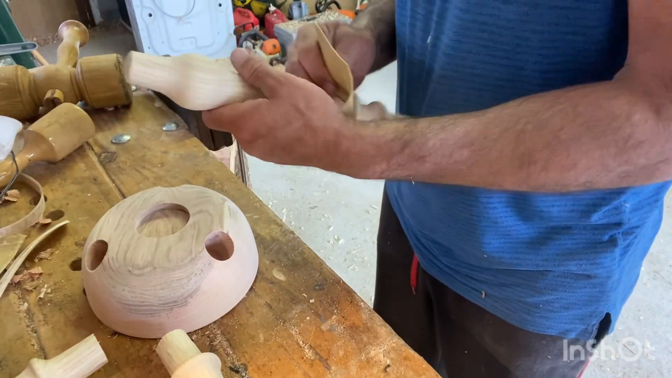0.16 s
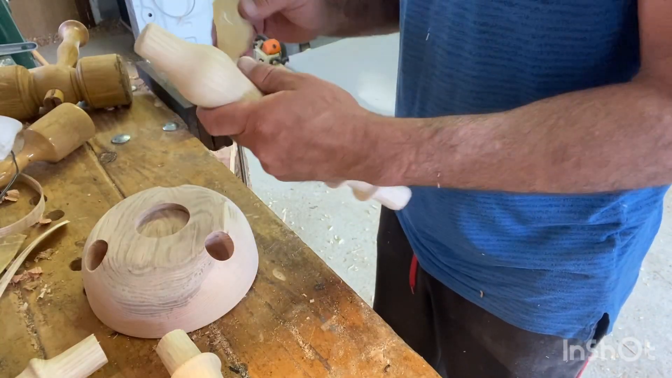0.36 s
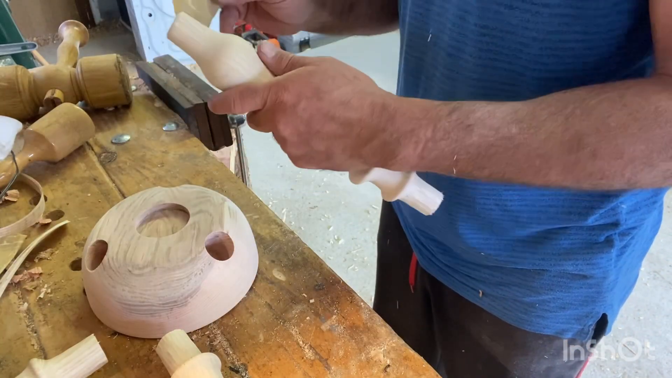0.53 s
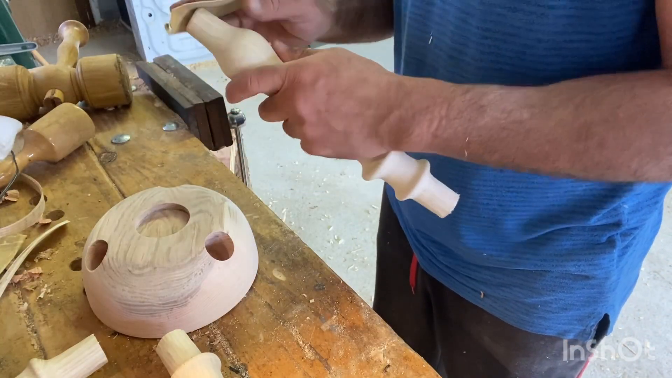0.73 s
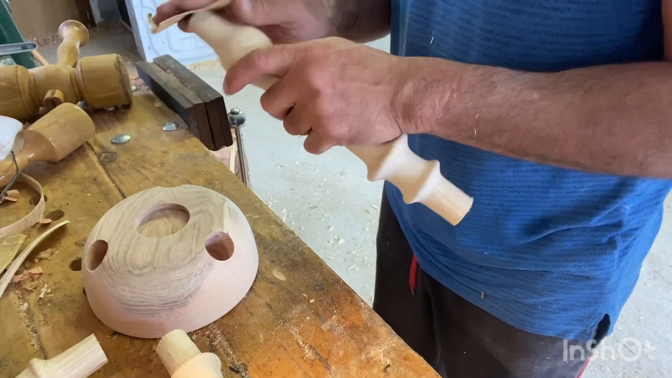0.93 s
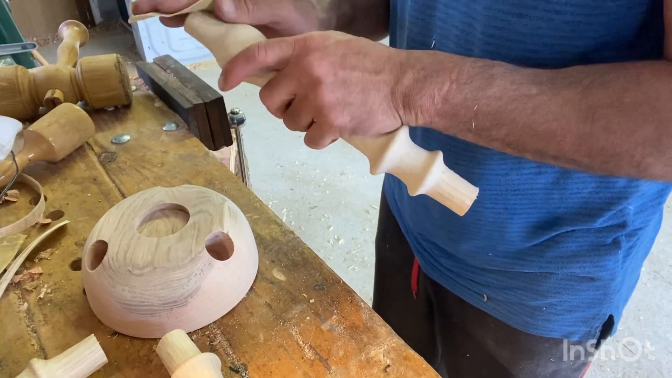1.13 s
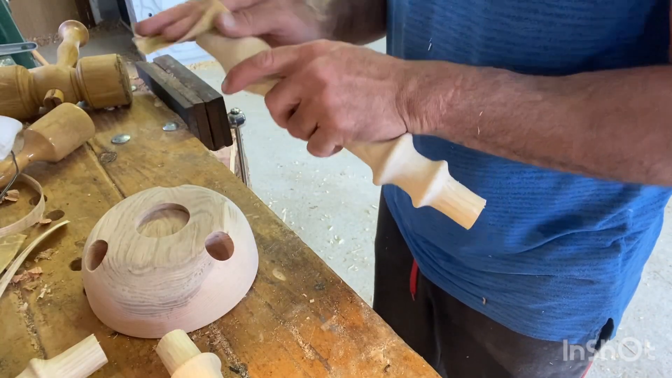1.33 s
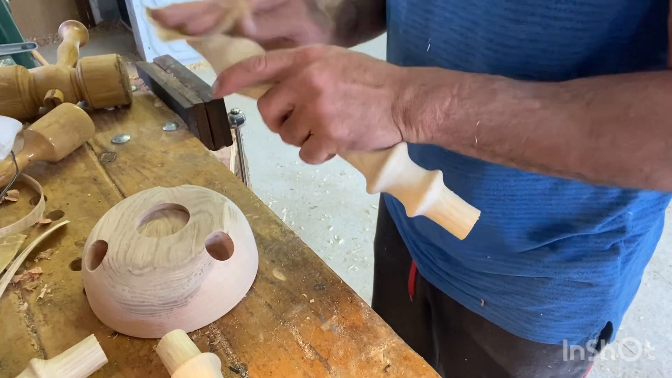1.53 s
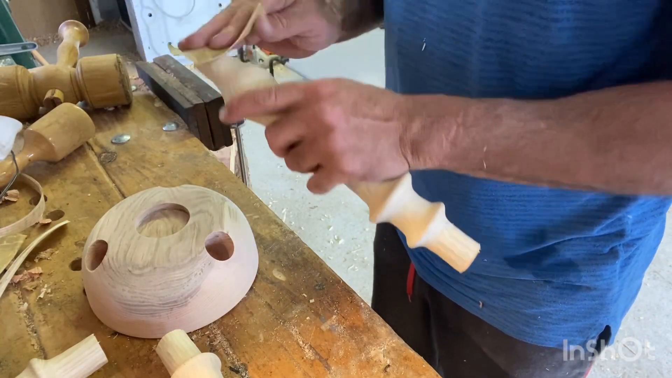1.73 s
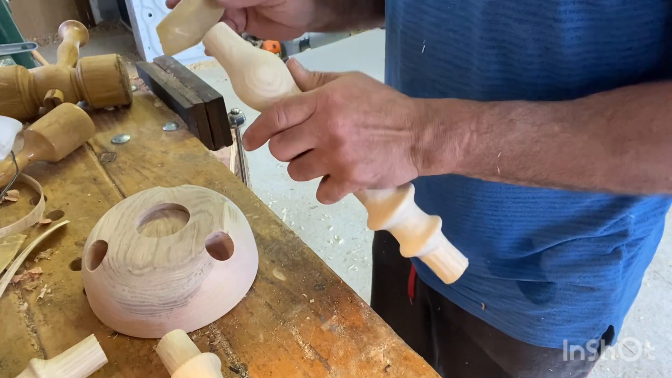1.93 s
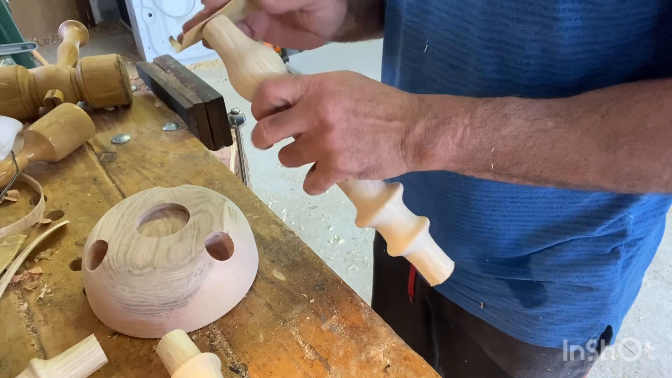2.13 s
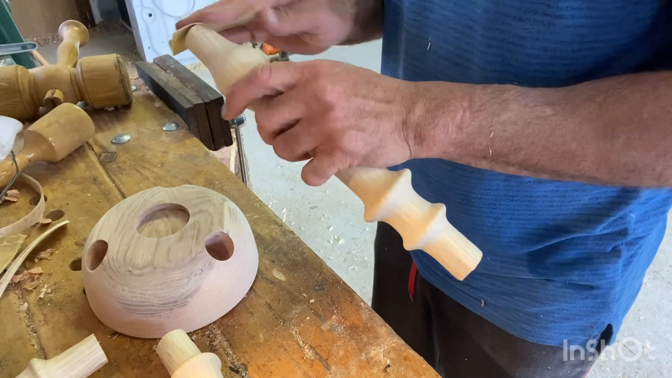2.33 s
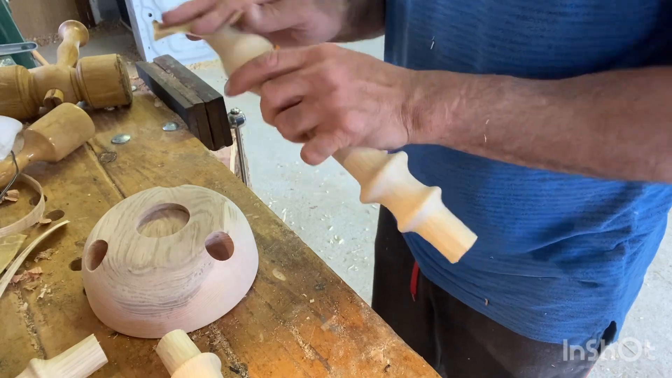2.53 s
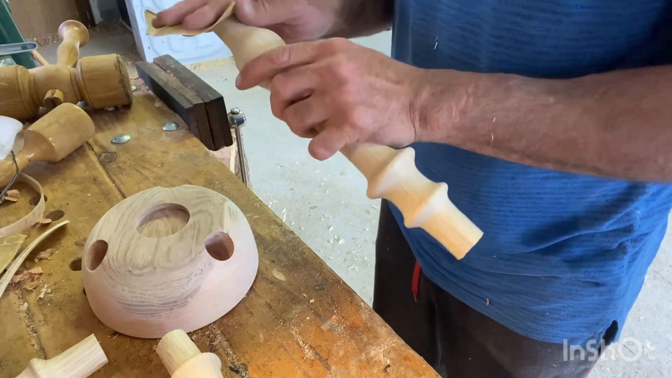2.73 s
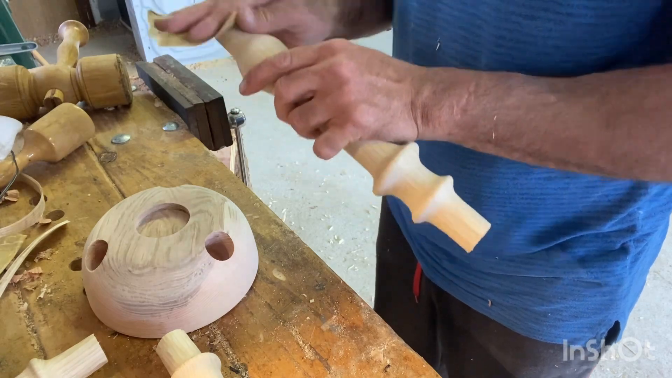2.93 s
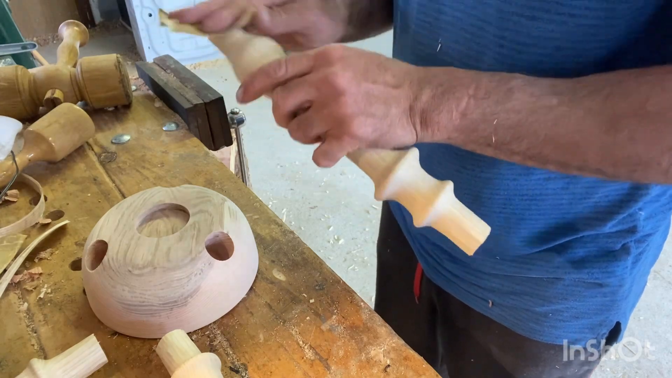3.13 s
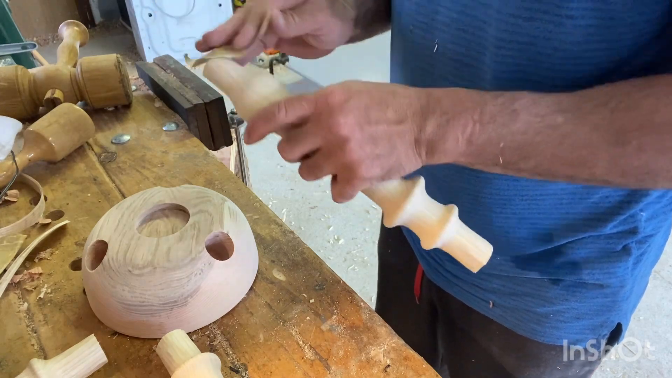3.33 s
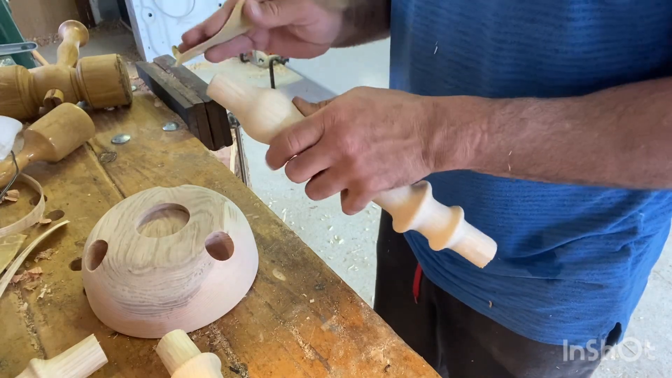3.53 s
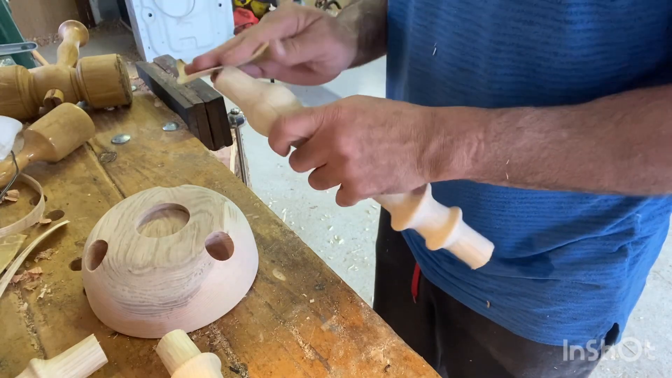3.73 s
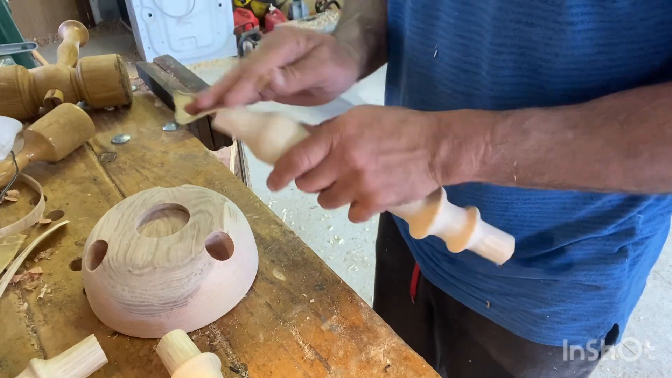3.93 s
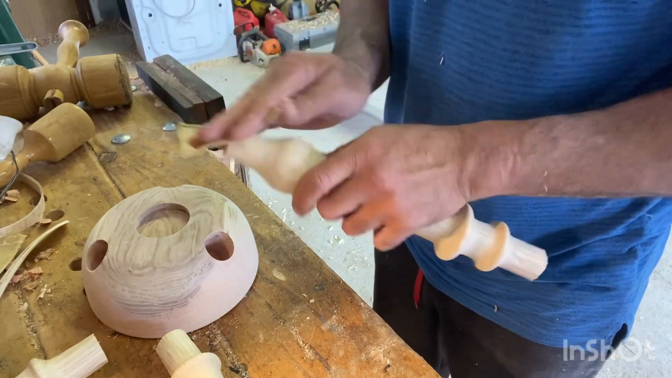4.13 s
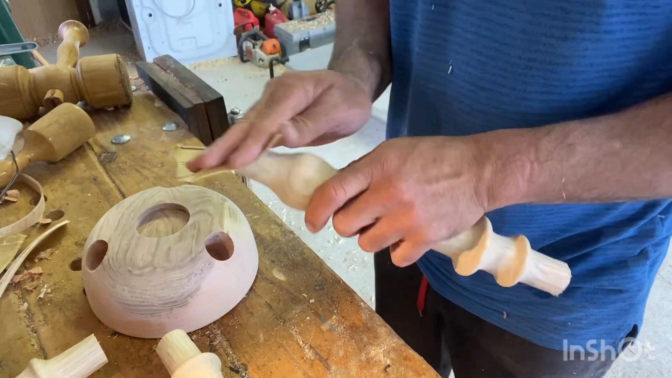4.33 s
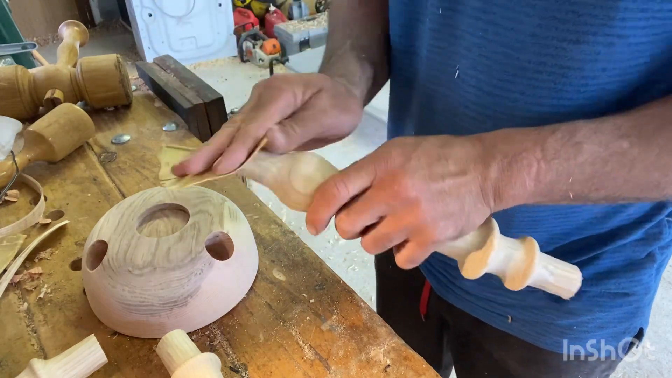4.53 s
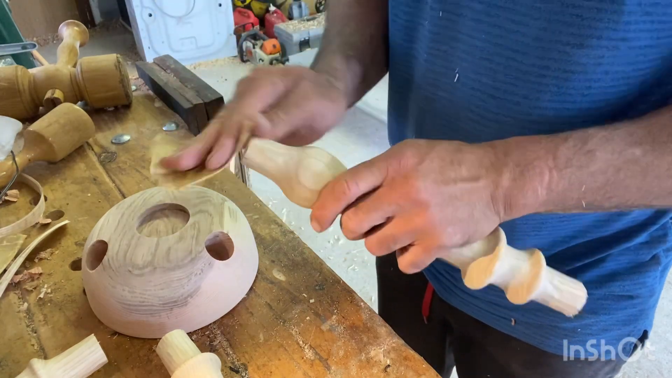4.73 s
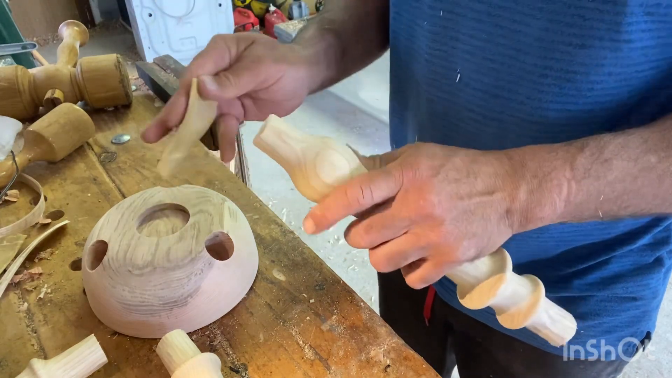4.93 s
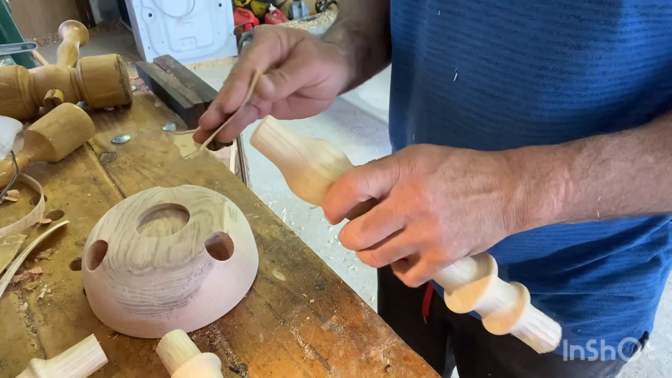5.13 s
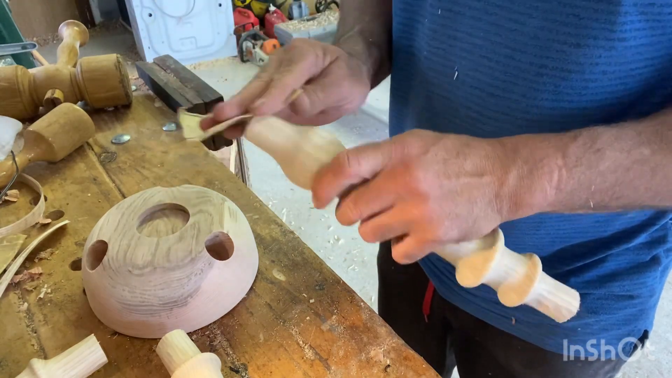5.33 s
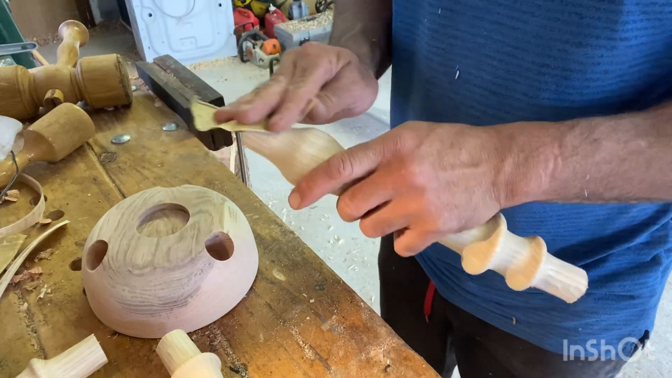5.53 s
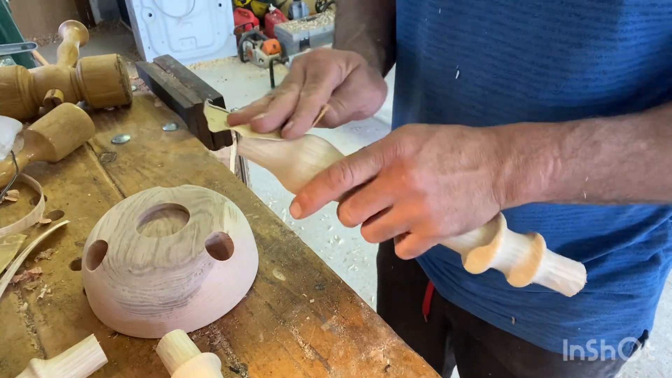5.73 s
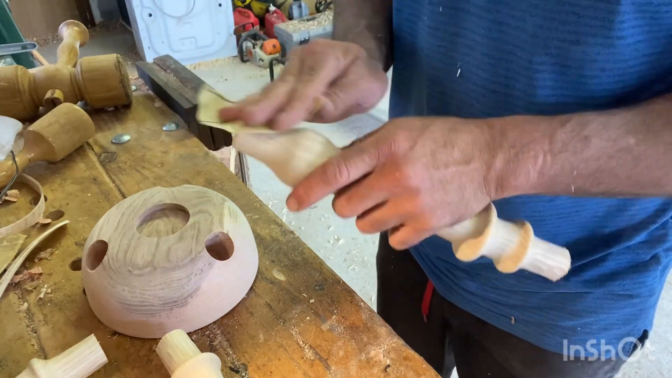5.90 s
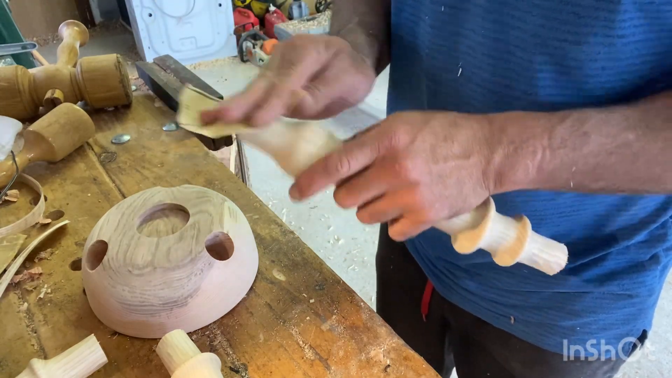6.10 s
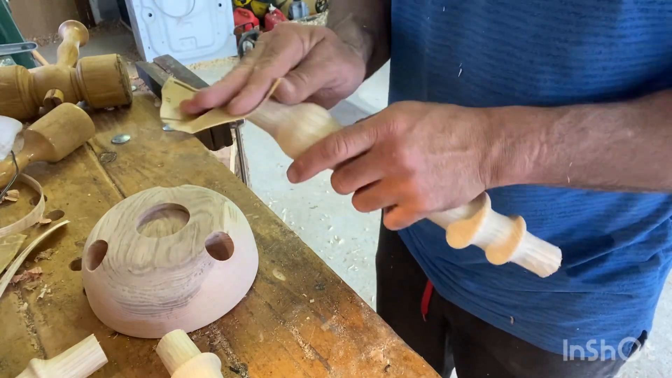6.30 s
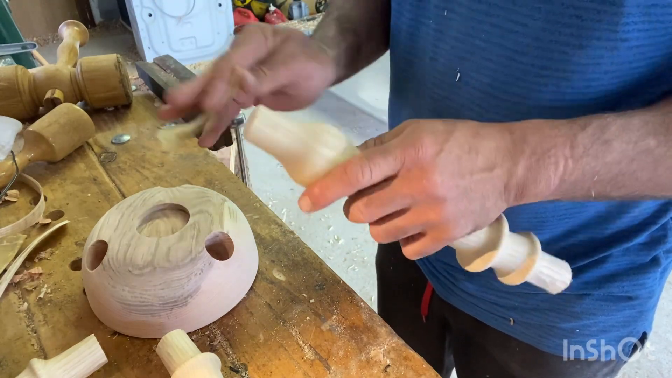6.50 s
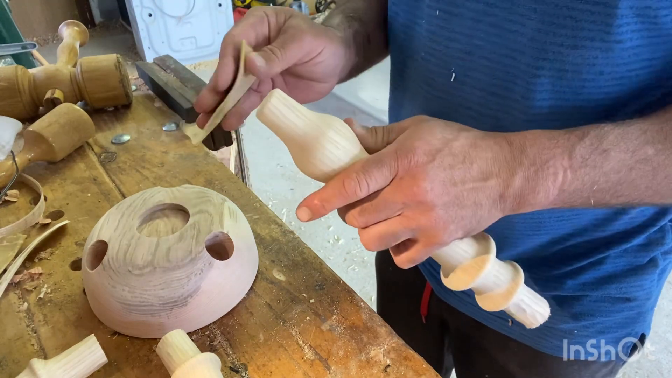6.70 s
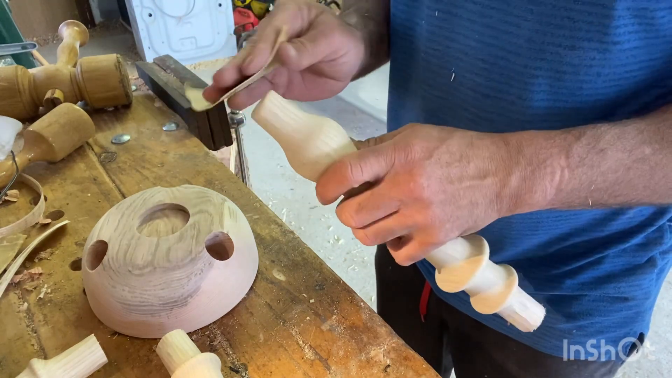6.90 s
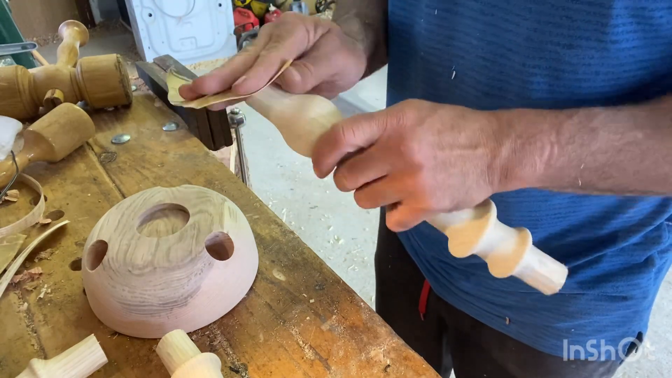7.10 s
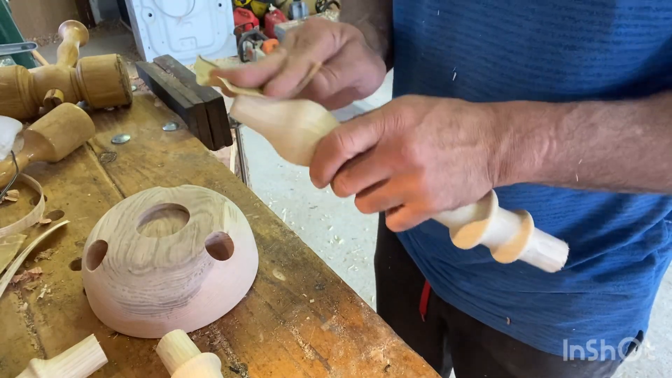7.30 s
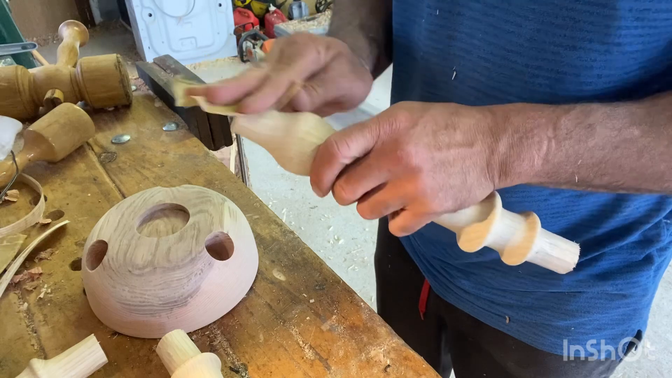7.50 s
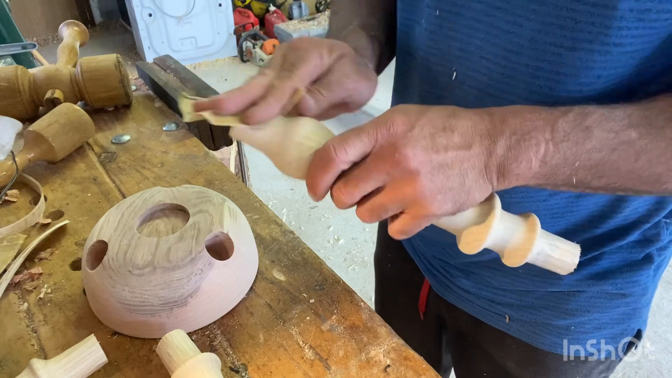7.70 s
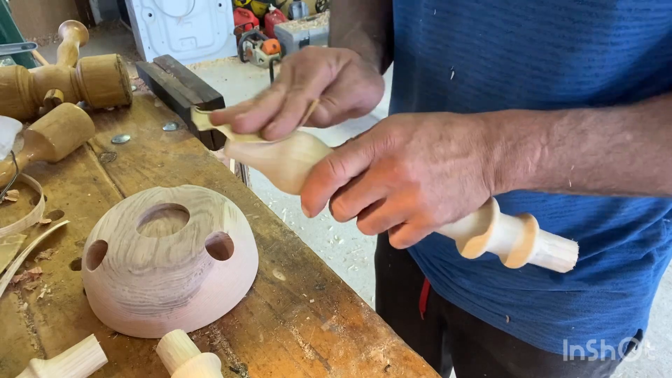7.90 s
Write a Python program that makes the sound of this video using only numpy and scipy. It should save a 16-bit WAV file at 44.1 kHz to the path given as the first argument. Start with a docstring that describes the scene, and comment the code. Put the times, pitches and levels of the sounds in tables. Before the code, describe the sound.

Close, scratchy hand sanding on a piece of wood in a small workshop. The paper brushes softly at first, then rasps to and fro in fast, fairly even strokes, stopping briefly three times and starting again. The wood resonates lightly under the grit, and paper or fingers tap it now and then. A faint mains hum, low rumble and thin hiss continue underneath.

```python
"""Sanding a wooden leg

A hand rubs sandpaper back and forth over the end of a turned wooden leg in a workshop.
Grit catches the grain in dense tiny clicks that hiss off the paper and ring the wood, with light
brushes and a few taps. The room answers, and mains hum, rumble and a faint hiss lie below."""
import sys
import numpy as np
from scipy import signal
from scipy.fft import rfft, irfft, next_fast_len
from scipy.io import wavfile

SR = 44100
rng = np.random.default_rng(int(sys.argv[2]) if len(sys.argv) > 2 else 0)


def master(y):
    """Save y as 16-bit WAV."""
    cut = np.clip(np.atleast_2d(y).T, -1, 1)
    pcm = np.round(cut * 32767)  # scale
    wavfile.write(sys.argv[1], SR, pcm.astype(np.int16))


N = 350595

# stereo lean across the spectrum: (frequency [Hz], left over right [dB])
PAN = [(60, 1.5), (240, 8), (950, 2.5), (3770, 4), (15000, -4.5)]


def from_db(db):
    return 10 ** (np.asarray(db) / 20)


def rms_one(x):
    return x / np.sqrt(np.mean(x ** 2) + 1e-20)


def at_hz(points, hz):
    freqs, values = np.transpose(points)
    return np.interp(np.log(hz), np.log(freqs), values)


def pan(left_over_right_db):
    return from_db([[left_over_right_db / 2], [-left_over_right_db / 2]])


def delayed(x, samples):
    return np.concatenate([np.zeros(samples), x])[:N]


def drift(rate_hz):
    """Smooth random wander of rms 1: low-passed noise, drawn at every 20th sample."""
    pole = np.exp(-2 * np.pi * rate_hz * 20 / SR)
    slow = signal.lfilter([1], [1, -2 * pole, pole ** 2], rng.standard_normal(N // 20 + 4002))[4000:]
    return np.interp(np.arange(N) / 20, np.arange(len(slow)), rms_one(slow))


def resonate(x, hz, width_hz):
    """Two-pole resonance scaled so that white noise keeps its rms."""
    r = np.exp(-np.pi * width_hz / SR)
    gain = np.sqrt((1 - r * r) / 2)
    return signal.lfilter([gain, 0, -gain], [1, -2 * r * np.cos(2 * np.pi * hz / SR), r * r], x)


def stereo_bands(sources, spectrum, flicker_db, flicker_hz):
    """Colours two (mid, side) noise pairs, which take turns feeding flickering third-octave bands."""
    # stereo image: (frequency [Hz], left-right correlation [0..1])
    correlation = [(30, .85), (130, .5), (400, .2), (1700, .75), (3000, .3), (6000, .1)]
    out, power = 0, 0
    edges = 20 * 2 ** (np.arange(30) / 3)
    for k, (low, high) in enumerate(zip(edges, edges[1:])):
        if high < spectrum[0][0] or low > spectrum[-1][0]:
            continue
        hz = np.sqrt(low * high)
        level = from_db(at_hz(spectrum, hz))
        power += level ** 2 * (high - low) / (SR / 2)
        band = signal.butter(2, [low, high], "band", fs=SR, output="sos")
        mid, side = signal.sosfilt(band, sources[k % 2])
        alike = at_hz(correlation, hz)
        pair = np.sqrt(1 + alike) * mid + np.sqrt(1 - alike) * side * [[1], [-1]]
        out += level * from_db(flicker_db * drift(flicker_hz)) * pan(at_hz(PAN, hz)) * pair
    return out / np.sqrt(2 * power)


def workshop_tone(hum_hz=99.8, hum_db=-63.5, bed_db=-63.5):
    """Wavering mains hum, off to the left, over a bed of rumble and faint hiss."""
    # colour of the bed: (frequency [Hz], relative density [dB])
    bed_spectrum = [(30, -22), (64, -2.5), (130, -19.5), (300, -29), (1700, -40.5), (3700, -35),
                    (6000, -28), (9300, -36), (10500, -73)]
    phase = 2 * np.pi * hum_hz * np.arange(N) / SR + .5 * drift(1.0)
    hum = np.sqrt(2) * from_db(hum_db + 2.6 * drift(5.4)) * np.sin(phase)
    bed = stereo_bands(rng.standard_normal((2, 2, N)), bed_spectrum, flicker_db=3.5, flicker_hz=2.5)
    return hum * pan(12.5) + from_db(bed_db) * bed


def room(x, t60_s=0.51, wall_cut_hz=8800):
    """Sound bounces between the walls: eight feedback delays a side, duller on every round."""
    size = next_fast_len(N + SR)
    omega = 2 * np.pi * np.arange(size // 2 + 1) / size
    pole = np.exp(-2 * np.pi * wall_cut_hz / SR)
    wall = (1 - pole) / (1 - pole * np.exp(-1j * omega))
    response = np.zeros((2, len(omega)), complex)
    for k, lag in enumerate((rng.uniform(.015, .045, 16) * SR).astype(int)):
        loop = from_db(-60 * lag / SR / t60_s) * wall * np.exp(-1j * omega * lag)
        response[k % 2] += loop / (1 - loop) * (-1) ** (k // 2)
    return irfft(response * rfft(x.mean(axis=0), size), size)[:, :N]


def near_echoes(x, palm_lag_s=.0006, bench_lag_s=.0023, sway=.3, strength=.6):
    """Bounces off palm and bench wander with the hand and comb the hiss differently on every stroke."""
    for lag_s in (palm_lag_s, bench_lag_s):
        lag = (SR * lag_s * np.exp(sway * drift(4.0))).astype(int)
        echo = x[:, np.maximum(np.arange(N) - lag, 0)]
        x = (x + strength * echo) / np.hypot(1, strength)
    return x


def taps():
    """Paper and fingers tap the wood: one click each, and the dull thud of the fingertip behind it."""
    # taps on the leg: (time [s], click drive [dB], thud peak [dB])
    hits = [(0.237, -43, -47.5), (4.012, -39, -55), (4.819, -47, -75), (6.797, -41.5, -70),
            (7.573, -36, -56)]
    impulses = np.full((2, N), 1e-18)
    for time_s, *levels_db in hits:
        impulses[:, round(time_s * SR)] = from_db(levels_db)
    clicks, fingertip = impulses
    thuds = resonate(fingertip, hz=820, width_hz=110)
    return clicks, thuds * fingertip.max() / np.abs(thuds).max()


def contact(start, end, slope_db, rise_s, fall_s=0.0058, arch_db=1):
    """Span and envelope of one rub; it swells mid-stroke, where the hand moves fastest."""
    span = slice(max(int((start - .06) * SR), 0), min(int((end + .1) * SR), N))
    t = np.arange(span.start, span.stop) / SR
    gate = 1 / (1 + np.exp((start - t) / rise_s)) / (1 + np.exp((t - end) / fall_s))
    along = np.interp(t, [start, end], [-1, 1])
    return span, gate * from_db(slope_db / 2 * along + arch_db * (.5 - along ** 2))


def hand_pressure(pause_s=.09, firm_db=-32.5, firm_shake_db=-40, wood_follows=0.68):
    """Rubbing strength, and the part that shakes the wood; after a pause the paper lands abruptly."""
    # sanding strokes: (start [s], end [s], drive [dB], change along the stroke [dB])
    strokes = [(0.696, 0.742, -42, 10.5), (0.79, 0.869, -40, 11.5), (0.916, 1.009, -39, -10.5),
               (1.038, 1.121, -39, -0.5), (1.156, 1.227, -36.5, 2.5), (1.271, 1.351, -29.5, 2),
               (1.388, 1.461, -30, 1), (1.504, 1.577, -31, 3), (1.632, 1.685, -30, 7.5),
               (1.734, 1.77, -36, 10.5), (2.138, 2.18, -49, 8), (2.199, 2.245, -43, 1),
               (2.304, 2.353, -31.5, 2), (2.408, 2.482, -35.5, -1.5), (2.522, 2.596, -35, -5),
               (2.641, 2.708, -34, 1), (2.753, 2.828, -34.5, -5), (2.877, 2.935, -31.5, 2.5),
               (2.977, 3.055, -33, 1.5), (3.091, 3.16, -34, 1), (3.208, 3.298, -34.5, -12.5),
               (3.308, 3.353, -38, 6), (3.711, 3.786, -47.5, 0.5), (3.788, 3.854, -42, -3),
               (3.888, 3.964, -34.5, -8), (4.008, 4.082, -38, 6.5), (4.118, 4.176, -32.5, 2),
               (4.226, 4.302, -33.5, 0), (4.332, 4.405, -34, -7), (4.449, 4.513, -30, 1),
               (4.556, 4.622, -33, -10.5), (4.667, 4.738, -29.5, 2), (5.234, 5.313, -48, -1),
               (5.315, 5.379, -33.5, 8.5), (5.416, 5.477, -31.5, -1.5), (5.533, 5.593, -39.5, -2),
               (5.634, 5.701, -33, -9), (5.741, 5.812, -33, 8), (5.849, 5.919, -33, 2.5),
               (5.972, 6.04, -31.5, -0.5), (6.08, 6.153, -32, -8.5), (6.195, 6.271, -33.5, -4.5),
               (6.309, 6.421, -31.5, -13), (6.411, 6.44, -30.5, 16.5), (6.985, 7.024, -43, 0),
               (7.028, 7.085, -39, 3.5), (7.127, 7.208, -30.5, -2), (7.259, 7.319, -36.5, -5),
               (7.393, 7.433, -57, 11), (7.481, 7.542, -36, -6), (7.581, 7.643, -34, -3),
               (7.693, 7.754, -33.5, -9), (7.792, 7.861, -30, 4.5), (7.911, 7.966, -32, -9)]
    # bite into the wood as the paper tilts on the end grain: (time [s], shake offset [dB])
    bite = [(0.75, -2), (0.95, 3), (1.3, -3.5), (1.75, -8.5), (2.2, 1.5), (2.45, -1.5), (3.3, -7),
            (3.75, 0.5), (4.7, -7.5), (5.35, 1), (5.7, -1.5), (6.4, -3.5), (7.15, -1.5), (7.3, -2),
            (7.9, -7)]
    # light brushes of paper or fingers in the pauses: (start [s], end [s], drive [dB], wood share [dB])
    brushes = [(0.144, 0.206, -61.5, -9), (0.22, 0.29, -63.5, -3), (0.291, 0.334, -50, -14),
               (0.37, 0.4, -46, -18), (0.501, 0.541, -44.5, -24), (0.583, 0.611, -50, -14),
               (0.633, 0.657, -59, -26), (2.09, 2.144, -57, -13), (3.546, 3.581, -61.5, -44),
               (4.975, 5.074, -55, -24), (5.176, 5.22, -55, -33), (6.675, 6.746, -55.5, -39)]
    force = np.zeros((2, N))
    last_end = -np.inf
    for start, end, db, slope_db in strokes:
        lands = start - last_end > pause_s
        span, shape = contact(start, end, slope_db, rise_s=.0006 if lands else .0053)
        shake_db = firm_shake_db + wood_follows * (db - firm_db) + np.interp(start, *np.transpose(bite))
        force[:, span] += shape * from_db([[db], [shake_db]])
        last_end = end
    for start, end, db, share_db in brushes:
        span, shape = contact(start, end, slope_db=-3.5, rise_s=.0035)
        force[:, span] += shape * from_db([[db], [db + share_db]])
    return force * from_db(0.82 * drift(38.0))   # the paper catches and slips unevenly


def grit(per_s, spread_db, streams):
    """Grains catching the wood fibres: dense clicks of uneven size, coming in clumps."""
    shape = (streams, N)
    sizes = from_db(spread_db * np.minimum(rng.exponential(1, shape), 5)) * rng.standard_normal(shape)
    catches = rng.random(shape) < per_s / SR
    return rms_one(sizes * catches) * from_db(drift(57))


def wooden_leg(rubbing, shake, clicks, fingers_db=-81.5):
    """Grit and taps ring the modes of the leg; the holding hand damps some and frees others."""
    # modes of the leg: (frequency [Hz], width [Hz], then gain under each of six grips [dB])
    modes = [(380.8, 20, -21, -18.5, -18.5, -17, -13, -6), (650, 77, -17.5, -23, -11, -14.5, -16, -8.5),
             (872, 56, -8, -2, -1.5, -6.5, -0.5, 2), (1152, 56, -1, 3.5, 1.5, 0, 4, 0.5),
             (1305, 77, -8, -38, -3.5, -2.5, -2, -2.5), (1496, 42, -13, -6.5, -3, -3, 0.5, 2),
             (1665, 115, -6.5, -3.5, 0, -9.5, -9, 0), (2125, 160, -4, -3.5, -7, -2, 2.5, 6.5),
             (2358, 50, -16, -9, -18, -5.5, -16, 7.5), (2570, 130, -19, -13, -3.5, -10, -12, 9),
             (2844, 58, 1, 5, 1.5, -7.5, -3.5, -19), (3280, 100, -17, -29, -28, -12, -3.5, -18),
             (4734, 230, -10.5, -9.5, -9, -7, -16, -30), (6355, 660, -7.5, -7.5, -5.5, -4, -9.5, -9)]
    # changes of hold: (time [s], grip [0..5])
    grips = [(0, 0), (1.95, 1), (3.6, 2), (5.1, 3), (6.9, 4), (7.24, 5), (7.56, 4)]
    out = np.zeros((2, N))
    grains = grit(per_s=9000, spread_db=2.0, streams=3)
    fingers = from_db(fingers_db + 4 * drift(6))   # the holding hand never quite rests
    cuts = [round(time_s * SR) for time_s, _ in grips] + [N]
    for k, (hz, width_hz, *grip_db) in enumerate(modes):
        force = shake if hz < 3500 else rubbing   # the thin tip rings with the rubbing itself
        flicker = from_db(2.8 * drift(8))
        push = (force + fingers) * grains[k % 3] * flicker + from_db(9) * clicks
        left = np.concatenate([from_db(grip_db[grip]) * resonate(push[a:b], hz, width_hz)
                               for a, b, (_, grip) in zip(cuts, cuts[1:], grips)])
        right = delayed(left, round(SR / hz * 0.076 * (k % 4)))
        polarity = (-1) ** k   # keeps the skirts of the modes from piling up
        out += polarity * pan(at_hz(PAN, hz)) * [left, right]
    return from_db(-6) * out


def sandpaper(rubbing, clicks, puff_s=0.003):
    """Grit hisses brightly straight off the paper; a tap adds a short puff."""
    # colour of the hiss: (frequency [Hz], relative density [dB])
    hiss_spectrum = [(120, -20), (600, -17.5), (1200, -13.5), (2000, -2), (4750, 2.5), (8000, -3),
                     (9500, -6), (10300, -33), (13500, -45), (15500, -56)]
    puff = from_db(0.1) * signal.lfilter([1], [1, -np.exp(-1 / (puff_s * SR))], clicks)
    scratch = (rubbing + puff) * grit(per_s=12000, spread_db=2.2, streams=4)
    hiss = stereo_bands(scratch.reshape(2, 2, N), hiss_spectrum, flicker_db=2.5, flicker_hz=9.9)
    return from_db(-5) * hiss


def scene():
    """One hand drives both wood and paper; both feed the room, over the workshop's tone."""
    rubbing, shake = hand_pressure()
    clicks, thuds = taps()
    wood = wooden_leg(rubbing, shake, clicks) + thuds
    hiss = near_echoes(sandpaper(rubbing, clicks))
    reverb = from_db(-14.5) * room(hiss + from_db(-4) * wood)
    return wood + hiss + reverb + workshop_tone()


def record(dry, treble_hz=7100, treble_share=.9, treble_lag_s=.000193, stop_hz=15700):
    """The right channel takes the left's treble, late and inverted; the top is cut steeply."""
    size = next_fast_len(N + SR // 10)
    left, right = rfft(dry, size)
    hz = np.arange(len(left)) * SR / size
    shared = treble_share / (1 + (treble_hz / (hz + 1)) ** 24)
    late_left = left * np.exp(-2j * np.pi * hz * treble_lag_s)
    right = np.sqrt(1 - shared) * right - np.sqrt(shared) * late_left
    stereo = irfft([left, right], size)[:, :N]
    return signal.sosfilt(signal.cheby2(12, 70, stop_hz, fs=SR, output="sos"), stereo)


dry = scene()
out = record(dry)
master(out)
```